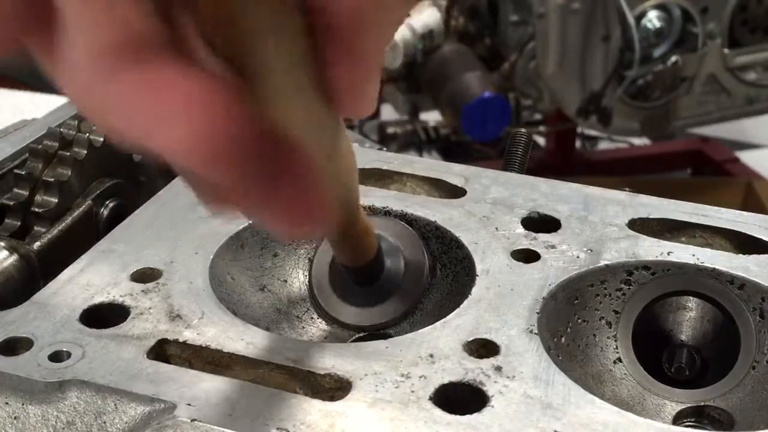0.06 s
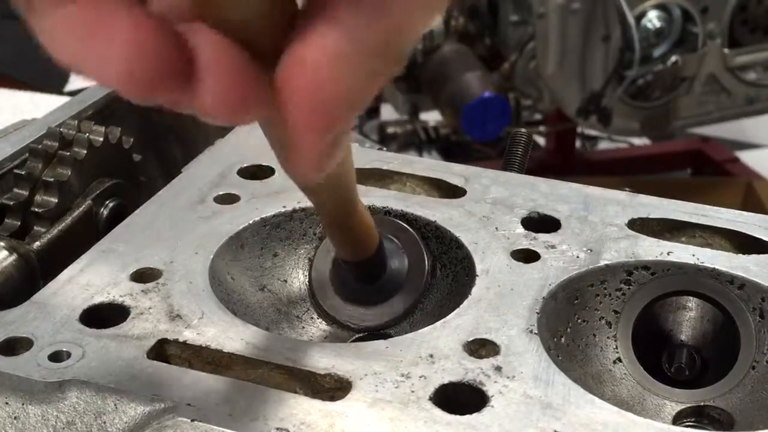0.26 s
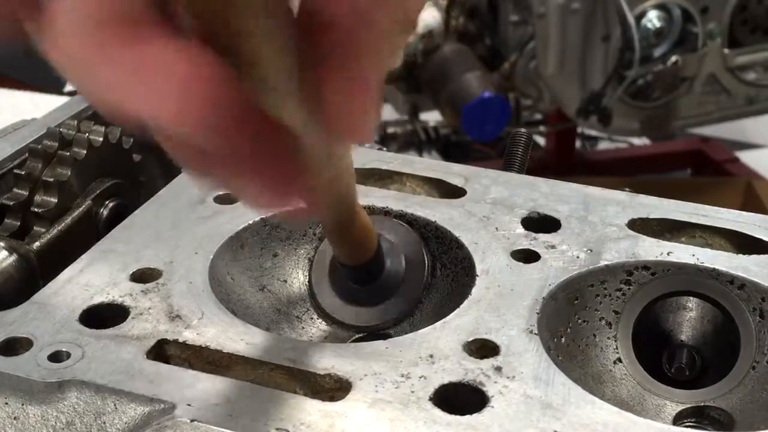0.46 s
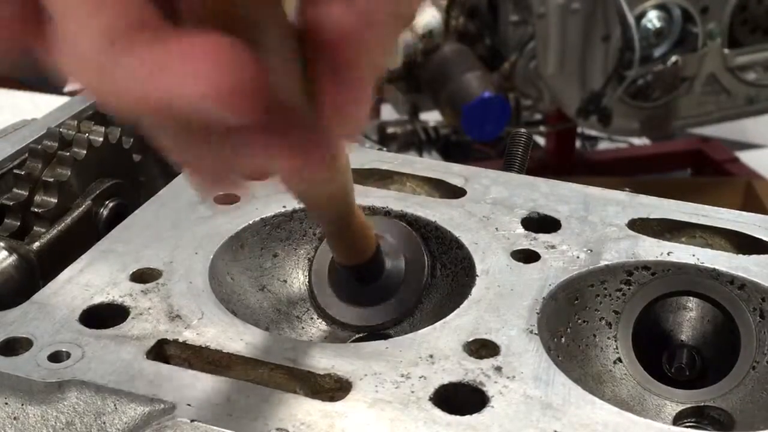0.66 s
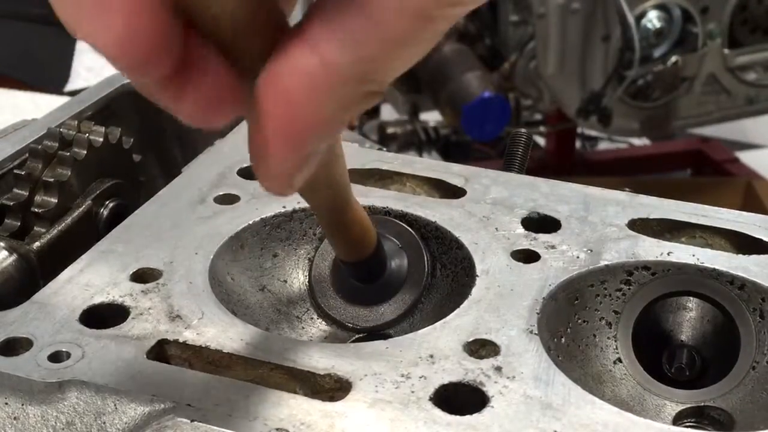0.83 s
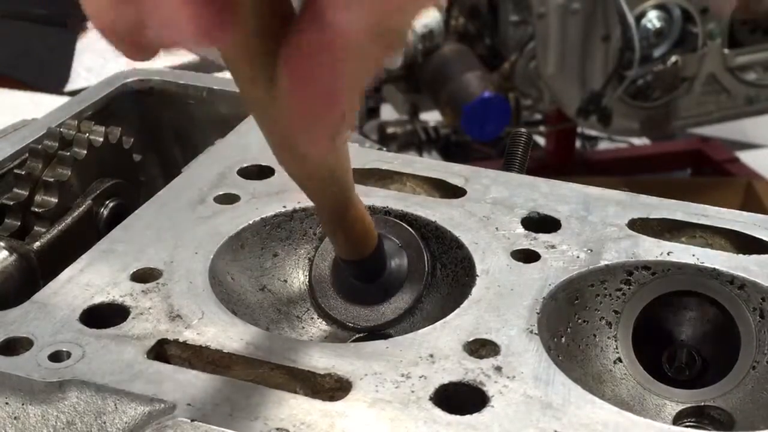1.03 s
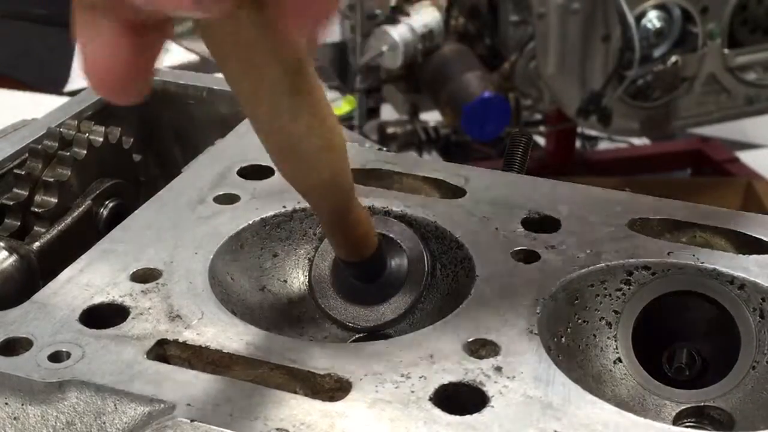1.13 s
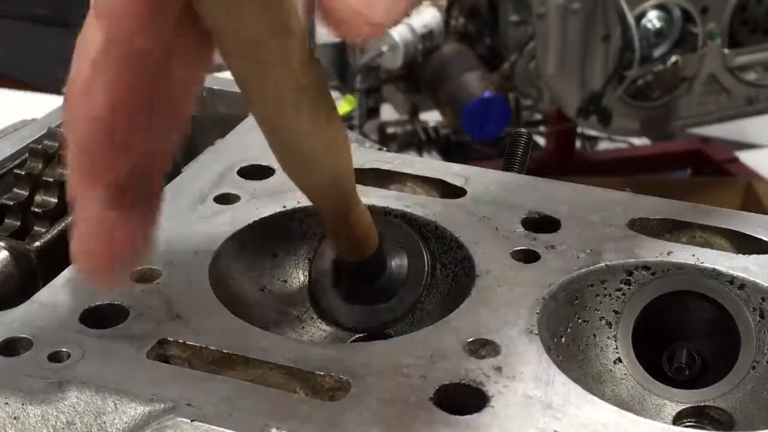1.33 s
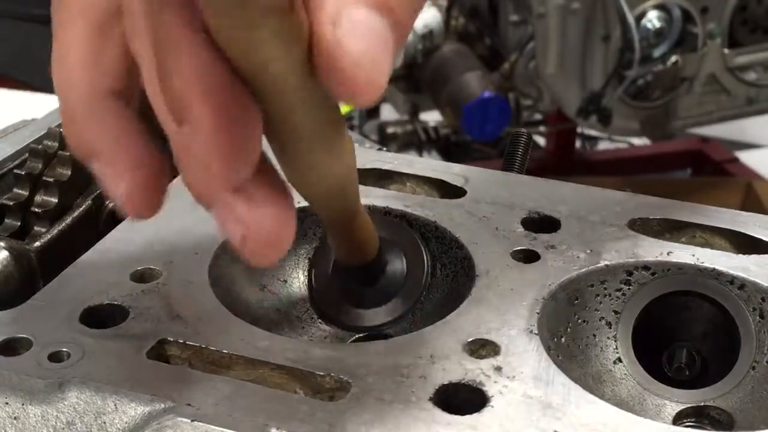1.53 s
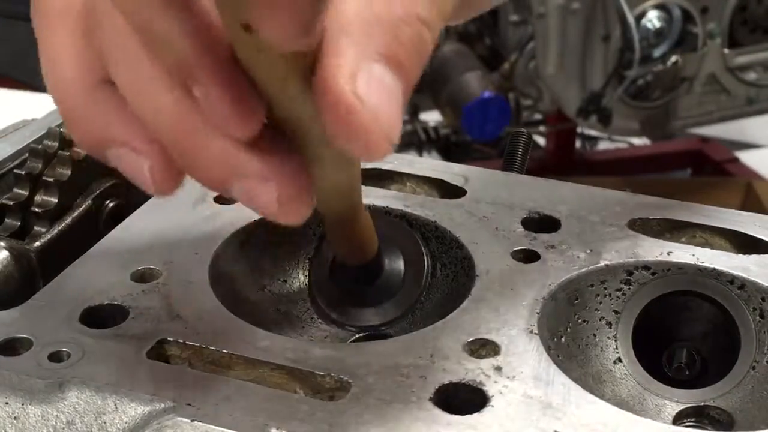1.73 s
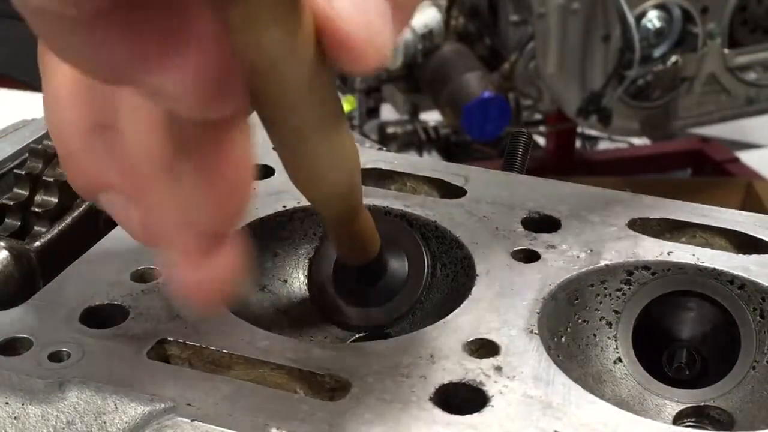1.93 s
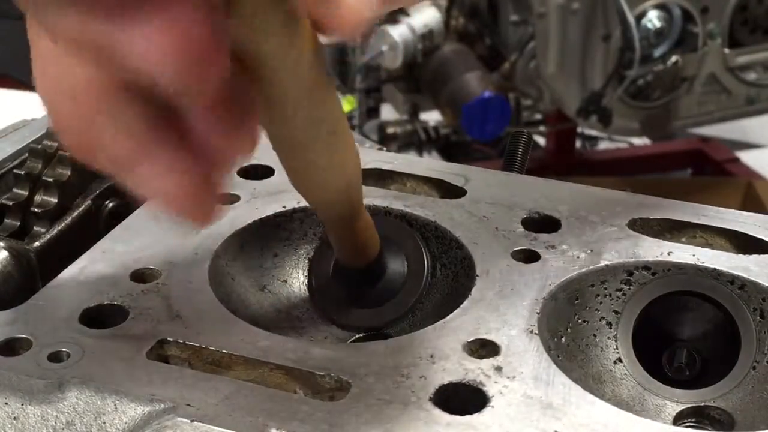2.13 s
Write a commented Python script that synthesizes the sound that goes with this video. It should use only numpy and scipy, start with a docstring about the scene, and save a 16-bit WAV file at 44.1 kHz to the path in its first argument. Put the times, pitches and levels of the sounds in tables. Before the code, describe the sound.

An engine valve grinds against its metal seat in four quick, gritty twists with a slight steely judder. After a short pause, two more rasping twists follow. Heard close up in a small workshop with a faint low hum.

```python
"""Lapping a valve by hand

Close up in a workshop, a lapping stick twists a valve to and fro on its seat. Each twist crushes
grinding paste: dense grit rasps, rings the steel and makes the valve judder near 1.2 kHz.
Four twists, a pause to change grip, two more; a small room and a low hum lie behind."""
import sys
import numpy as np
from scipy import signal
from scipy.fft import rfft, irfft, next_fast_len
from scipy.io import wavfile

SR = 44100
rng = np.random.default_rng(int(sys.argv[2]) if len(sys.argv) > 2 else 0)


def put_to_file(sound):
    """Save the sound as 16-bit audio at rate SR, in the file named by the first command-line argument."""
    columns = np.atleast_2d(sound).T  # one column per channel
    safe = np.clip(columns, -1, 1)
    whole_steps = np.round(safe * 32767)
    wavfile.write(sys.argv[1], SR, whole_steps.astype(np.int16))


N = 96182

# Tone of the workshop's rumble: f/Hz, relative level/dB
RUMBLE_COLOUR = [(20, -26), (45, -13.5), (90, -15), (120, 0), (190, 3), (270, -10.5), (500, -16.5),
                 (1200, -21), (2500, -29.5), (6000, -31.5), (15000, -37.5)]
# Skin brushing the wooden stick: middle t/s, half length/s, level/dB
FINGER_BRUSHES = [(1.174, 0.047, -75), (1.275, 0.024, -72.5)]
# Fingers tapping the stick: t/s, f/Hz, level/dB
FINGER_TAPS = [(1.097, 2570, -66), (1.259, 1910, -69.5), (1.407, 2325, -68)]
# A hard grain breaking: t/s, f/Hz, width/Hz, decay/s, level/dB
HARD_GRAIN = (1.992, 5200, 2000, .014, -39)
# Coarse grains catching and crumbling: t/s, level/dB
GRAIN_CATCHES = [(0.107, -39.5), (.308, -53), (0.533, -40), (0.684, -42.5), (0.708, -44), (.732, -50),
                 (.879, -43.5), (0.93, -47), (1.699, -54), (1.714, -49)]
# Coarse grains jolting the valve: t/s, peak level/dB
GRAIN_JOLTS = [(0.084, -26.5), (.135, -25.5), (.227, -28), (.326, -21.5), (.335, -15), (.446, -27),
               (.532, -26.5), (0.559, -23.5), (0.589, -23), (0.66, -26.5), (.68, -28.5), (0.689, -23.5),
               (0.708, -28), (0.786, -26), (.828, -21.5), (0.876, -34), (0.928, -37), (0.968, -41),
               (1.09, -47.5), (1.511, -23.5), (1.614, -21), (1.65, -23), (1.734, -23), (1.93, -45),
               (1.951, -25.5), (2.061, -24), (2.097, -25.5)]
# Pushes of the hand: t/s, rise/s, length/s, rasp drive level/dB, change over the push/dB,
# judder offset/dB, hiss offset/dB
HAND_PUSHES = [(-.04, .01, 0.039, -56.5, 2, 3.5, 2), (0.076, 0.0036, 0.15, -43, -3.5, 3.5, 0),
               (0.245, .004, 0.016, -53.5, 0, 8.5, 0.5), (0.324, 0.0045, 0.05, -39.5, -3, 2, 1),
               (0.401, .004, 0.02, -50, 1.5, 2, -4), (0.437, 0.0025, 0.016, -45.5, -5.5, 3, 2.5),
               (0.529, 0.0071, 0.12, -43.5, 0.5, 2.5, -2), (0.673, 0.0054, 0.016, -49.5, -3, 10.5, 0),
               (0.701, 0.0023, 0.031, -46.5, -10.5, 4.5, 0.5), (0.777, 0.0023, 0.036, -49.5, 7, 1.5, -1),
               (0.801, 0.0091, 0.035, -41, 0, 0.5, 1.5), (.862, 0.0051, 0.047, -49, -3, 5.5, -3.5),
               (0.932, .003, 0.053, -55.5, -8.5, -4, -6), (1.477, 0.0019, 0.008, -73, -3.5, -2, 6),
               (1.493, .002, .005, -59.5, 2, 2, 3.5), (1.505, 0.0035, 0.131, -51.5, 5, 7, 2.5),
               (1.56, 0.0055, 0.24, -43, -7.5, 2, -3.5), (1.72, 0.0023, 0.035, -50.5, -3, 8, 7),
               (1.759, .004, 0.1, -49.5, -3.5, 9, 3), (1.855, .004, 0.0083, -56.5, -3, 10, 0),
               (1.923, 0.0049, 0.18, -43, -4, 5, -0.5), (2.132, 0.0054, 0.01, -50.5, -2.5, 9.5, 3)]
# Moments when the valve sticks: t/s
STICKING_TIMES = [0.437, 0.699, 1.725, 1.752, 1.858, 2.134]
# Boom of the bench: f/Hz, width/Hz, relative level/dB
BENCH_BOOM = [(188, 19, -2.5), (201.4, 23, 4)]
# Low modes of the valve in its seat: f/Hz, width/Hz, relative level/dB
SEAT_JUDDER = [(481.7, 6.9, -25), (577.6, 25, -16.5), (648.5, 61, -23), (952, 18, -15), (1032, 38, -15),
               (1120, 29, -4.5), (1169.8, 51, 2), (1210, 17.6, -16)]
# Ring of valve and cylinder head: f/Hz, width/Hz, relative level/dB
STEEL_RING = [(1997, 30, -1), (2333, 42, -3), (2900, 200, -14), (3500, 60, -9), (4050, 120, -14),
              (4517, 38, -3.5), (5589, 27, -3.5), (5884, 18, -8), (6282, 22, -10), (6547, 24, -7),
              (7470, 140, -18), (8900, 200, -19), (11400, 60, -15), (11720, 190, -14), (12400, 40, -16),
              (15400, 300, -14)]
# Singing note of the valve head: f/Hz, width/Hz, relative level/dB
HEAD_NOTE = [(3577, 36, 0)]
# Coarse rasp of crushed paste: f/Hz, relative level/dB
RASP_EQ = [(100, -22), (300, -16.5), (480, -8), (620, 8.5), (730, 5), (1000, 15), (1350, 6.5), (1600, 12.5),
           (1780, 4), (2200, -1), (3100, -4), (5000, -14), (9000, -27.5)]
# Fine hiss of the paste, also used for crackle and skin: f/Hz, relative level/dB
HISS_EQ = [(1500, -54.5), (3900, -7.5), (5000, -3.5), (6000, -1), (7500, 2), (10300, -5.5), (11700, 4.5),
           (13100, -6.5), (14500, -0.5), (15400, -2)]


def undb(db):
    """Decibels to gain."""
    return 10 ** (np.asarray(db) / 20)


def unit(x):
    """Scale to rms 1."""
    return x / np.sqrt(np.mean(x ** 2))


def through(x, response):
    """Filter by a response over f/Hz, keeping the power of white noise."""
    size = next_fast_len(2 * N)
    gain = response(np.fft.rfftfreq(size, 1 / SR))
    return irfft(rfft(x, size) * gain / np.sqrt(np.mean(abs(gain) ** 2)), size)[:N]


def colour(x, points):
    """Shape the tone with an EQ curve."""
    hz, db = np.array(points).T
    return through(x, lambda f: undb(np.interp(np.log(f + 1), np.log(hz), db)))


def ring(x, modes):
    """Drive a bank of resonators."""
    return through(x, lambda f: sum(undb(db) * 1j * f * width / (hz ** 2 - f ** 2 + 1j * f * width)
                                    for hz, width, db in modes))


def lowpass(x, hz):
    """Roll the treble off gently."""
    return signal.sosfilt(signal.butter(2, hz, fs=SR, output="sos"), x)


def waver(spread_db, per_s):
    """A gain that wanders at random, rms 1."""
    drift = unit(np.interp(np.arange(N) / SR * per_s, np.arange(N), rng.standard_normal(N)))
    return unit(undb(spread_db * drift))


def grains(per_s=8000, spread_db=-0.5):
    """Clicks of random timing and size, rms 1."""
    hits = rng.random(N) < per_s / SR
    polarity = np.sign(rng.standard_normal(N))
    return unit(hits * polarity * undb(spread_db * rng.standard_normal(N)))


def burst(t, start, hz, width, decay, db):
    """A band of noise with a hard attack and a dying tail."""
    band = [(hz, width, 0)]
    noise = unit(ring(ring(rng.standard_normal(N), band), band))
    return undb(db) * (t > start) * np.exp(-abs(t - start) / decay) * noise


def workshop(t, hum_hz=58.2):
    """The bed: low rumble and a wavering hum."""
    hum = np.sqrt(2) * np.sin(2 * np.pi * hum_hz * t) * waver(spread_db=4, per_s=12)
    return undb(-64) * hum + undb(-61.5) * colour(rng.standard_normal(N), RUMBLE_COLOUR)


def room(x, t, low_t60_s=0.5, treble_t60_s=0.38, predelay_s=0.004):
    """The small room adds a diffuse tail whose treble is weaker and dies first."""
    low = lowpass(rng.standard_normal(N), hz=1800) * undb(-60 * t / low_t60_s)
    treble = rng.standard_normal(N) * undb(-4.5 - 60 * t / treble_t60_s)
    tail = (low + treble) * (t > predelay_s)
    return x + undb(-16.5) * signal.fftconvolve(x, tail / np.sqrt(np.sum(tail ** 2)))[:N]


def grip(t):
    """Fingers slide along the stick and tap it as the grip changes."""
    sliding = sum(undb(db) * np.exp(-((t - middle) / half) ** 2) for middle, half, db in FINGER_BRUSHES)
    brush = sliding * colour(rng.standard_normal(N), HISS_EQ)
    taps = sum(burst(t, start, hz, width=0.46 * hz, decay=0.0075, db=db) for start, hz, db in FINGER_TAPS)
    return brush + taps


def crunch(t):
    """A hard grain breaks with a squeal and leaves the steel ringing."""
    squeal = burst(t, *HARD_GRAIN)
    return squeal + undb(-1.5) * ring(squeal, STEEL_RING)


def catches(t, decay_s=0.005):
    """Single coarse grains catch and crumble in a short crackle that rings the steel."""
    crumble = sum(undb(db) * (t > start) * np.exp(-abs(t - start) / decay_s)
                  for start, db in GRAIN_CATCHES)
    crackle = crumble * grains(per_s=3500)
    return colour(crackle, HISS_EQ) + ring(crackle, STEEL_RING)


def jolts(t, mode_hz=1184.4, rise_s=0.0028):
    """The valve rides over a coarse grain: its main mode swells for a few cycles and is damped again."""
    out = np.zeros(N)
    for start, db in GRAIN_JOLTS:
        phase, detune = rng.standard_normal(2)
        hz = mode_hz * (1 + 0.01 * detune)
        age = np.maximum(t - start, 0)
        swell = (age / rise_s * np.exp(1 - age / rise_s)) ** 1.3
        out += undb(db) * swell * np.sin(2 * np.pi * (hz * age + phase))
    return out


def hand(t, creep_s=0.014, release_db_per_s=325, stick_s=0.005):
    """Envelopes for rasp, judder and hiss: each push creeps, bites, holds and dies as the valve slows."""
    envelopes = np.zeros((3, N))
    for start, rise, length, db, change_db, judder_db, hiss_db in HAND_PUSHES:
        age = t - start
        progress = np.clip(age / length, 0, 1)
        creep = undb(-13) * np.exp(np.minimum(age, 0) / creep_s)  # a faint scrape before the bite
        attack = np.maximum(np.clip(age / rise, 0, 1), creep)
        release_db = release_db_per_s * np.maximum(age - length, 0)
        rasp = attack * undb(db + change_db * progress - release_db)
        hiss = rasp * undb(hiss_db + 2 * progress)  # the paste gets finer and brighter
        envelopes = np.maximum(envelopes, [rasp, rasp * undb(judder_db), hiss])
    stuck = sum(np.exp(-((t - moment) / stick_s) ** 2) for moment in STICKING_TIMES)
    return envelopes * undb(-14 * stuck)


def steel(force):
    """The grit rings the steel, and the valve head sings out under hard pressure."""
    shimmer = np.zeros(N)
    # The contact moves round the seat and favours one set of modes, then another.
    for modes in (STEEL_RING[0::2], STEEL_RING[1::2]):
        shimmer += ring(force * grains() * waver(spread_db=2.5, per_s=14), modes)
    pressure = force.max() * (force / force.max()) ** 1.19
    return undb(-2.5) * shimmer + undb(-2) * ring(pressure * grains(), HEAD_NOTE)


def paste(rasp, hiss, t, casting_t60_s=0.051):
    """Breaking grains rasp and hiss, coloured by the casting's countless small resonances."""
    clicks = grains()
    grit = undb(1) * colour(rasp * clicks, RASP_EQ) + undb(-3) * colour(hiss * clicks, HISS_EQ)
    tail = rng.standard_normal(N) * undb(-60 * t / casting_t60_s)
    casting = (tail - lowpass(tail, hz=860)) / np.sqrt(np.sum(tail ** 2))
    wet = undb(-2.5)
    return (grit + wet * signal.fftconvolve(grit, casting)[:N]) / np.hypot(1, wet)


def valve(judder, rasp):
    """Stick and slip shake the valve in its seat and thump through to the bench."""
    slips = grains(per_s=1200, spread_db=2)
    seat = ring(judder * slips, SEAT_JUDDER)
    dark_seat = lowpass(lowpass(seat, hz=1527), hz=1596)
    bench = ring(rasp * slips, BENCH_BOOM)
    return undb(12.5) * dark_seat + undb(-9.5) * bench


def scene():
    """The mono mix: grinding and its accents in the room, over the workshop bed."""
    t = np.arange(N) / SR
    rasp, judder, hiss = hand(t)
    spurts = waver(spread_db=0.4, per_s=130)  # the paste breaks unevenly
    grit = paste(rasp * spurts, hiss * spurts, t)
    ringing = steel(np.sqrt(rasp * hiss) * spurts)
    grinding = grit + ringing + valve(judder, rasp)
    accents = jolts(t) + catches(t) + crunch(t) + grip(t)
    return (room(grinding + accents, t) + workshop(t))[None]


def record(dry, top_hz=15700):
    """A steep high cut takes the air off the mix."""
    return signal.sosfilt(signal.ellip(10, .2, 80, top_hz, fs=SR, output="sos"), dry)


dry = scene()
out = record(dry)
put_to_file(out)
```